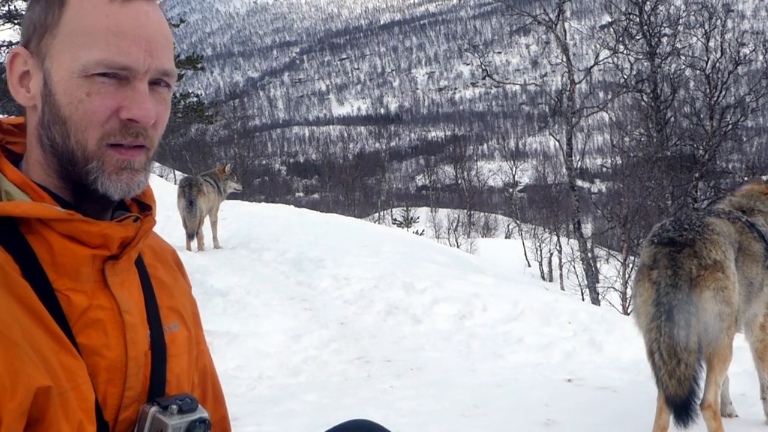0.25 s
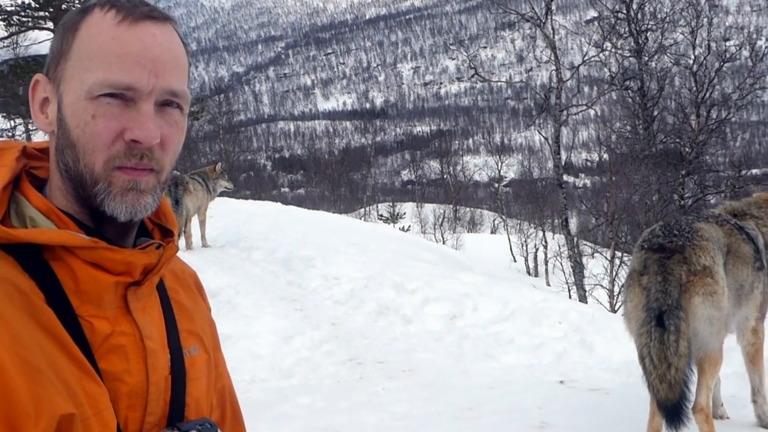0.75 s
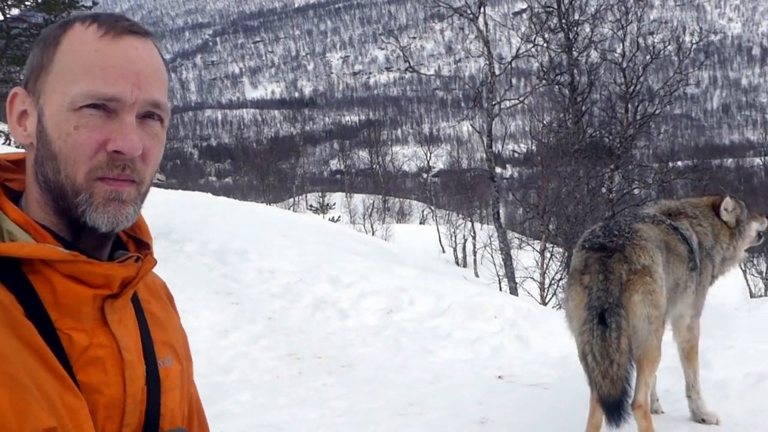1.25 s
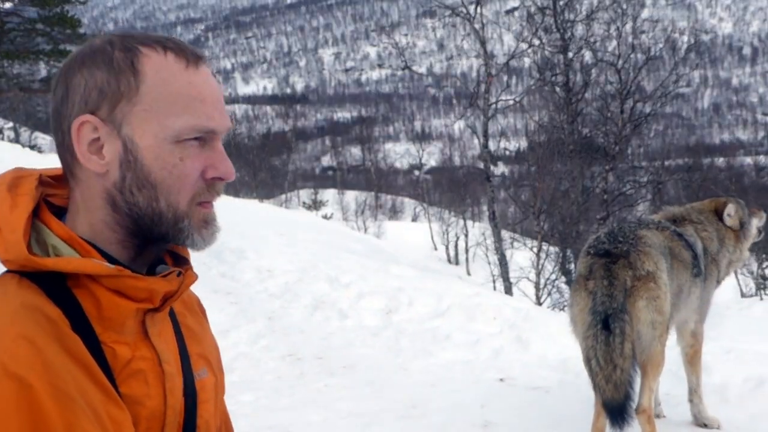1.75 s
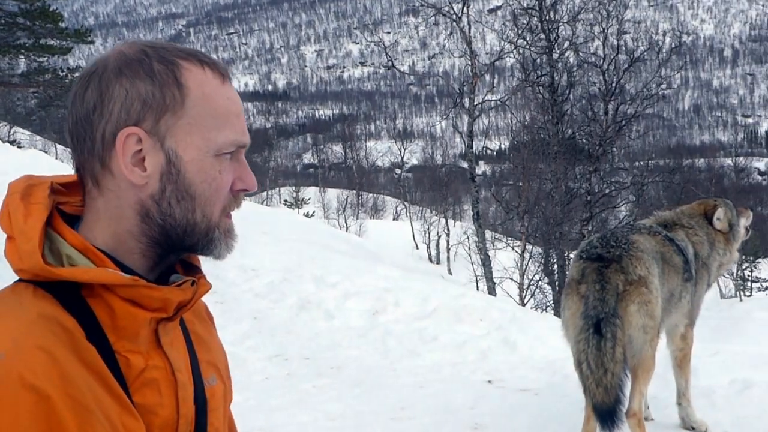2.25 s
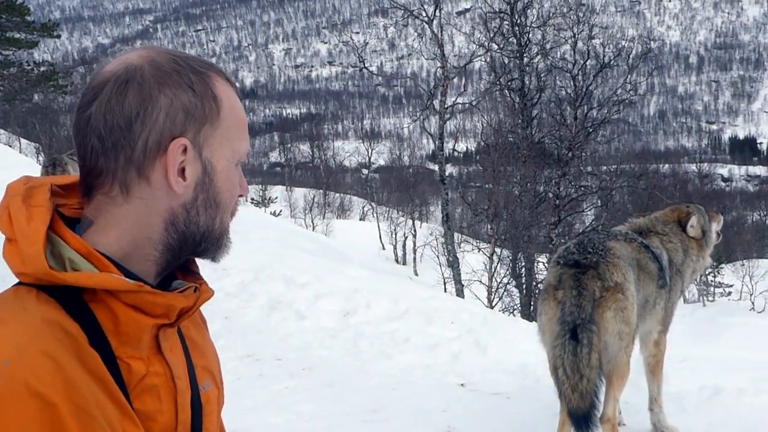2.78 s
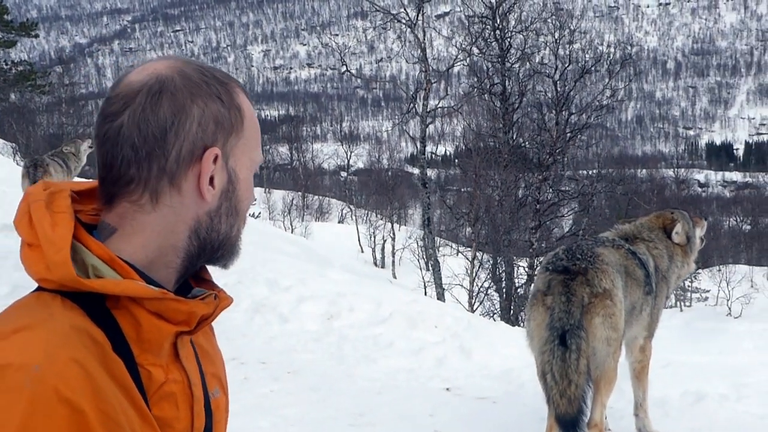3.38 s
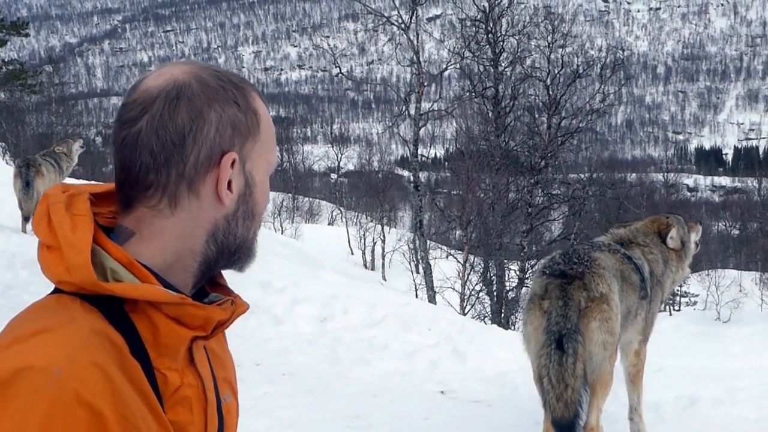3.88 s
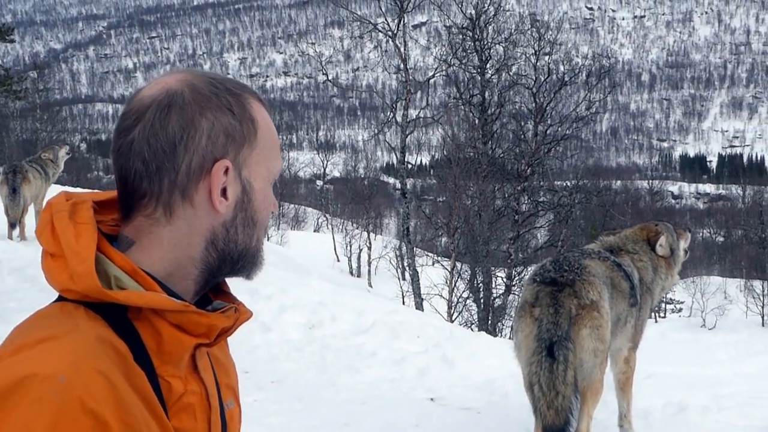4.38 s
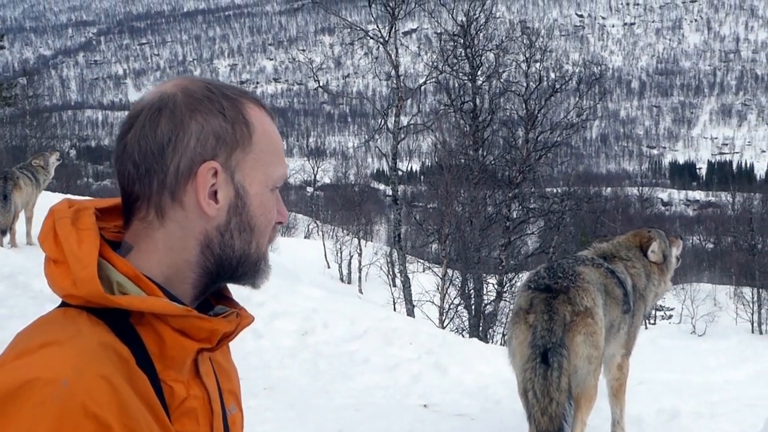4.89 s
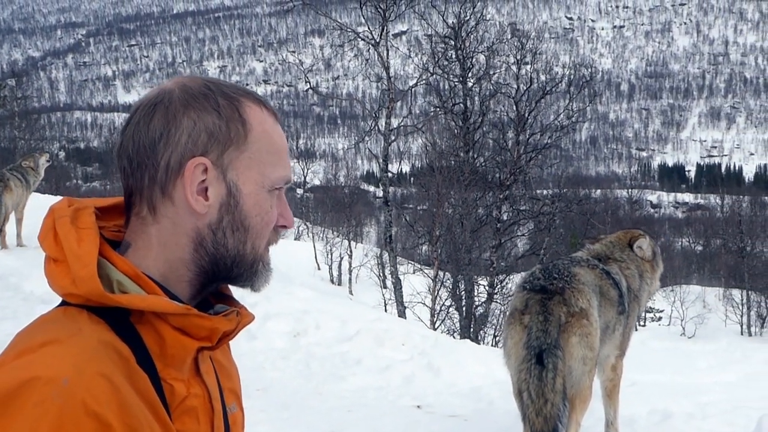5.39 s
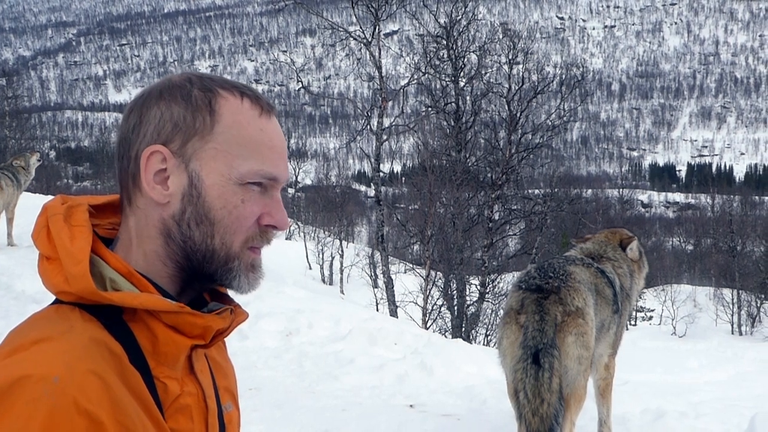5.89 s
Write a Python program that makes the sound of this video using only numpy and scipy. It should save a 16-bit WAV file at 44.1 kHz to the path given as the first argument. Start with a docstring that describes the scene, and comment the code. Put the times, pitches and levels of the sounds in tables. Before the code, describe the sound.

Wolves howl together on a snowy hillside, one close and loud, others behind it and far off, while low wind thumps buffet the microphone.

```python
"""Snowy hillside: a pack of wolves howls, one near, one a little further, others far off.
Howls are sums of gliding harmonics shaped by mouth and throat; they cross and beat.
The slopes return a faint echo built from sparse decaying reflections.
Wind buffets the two microphone ports separately as coloured random thumps.
Under it lie a thin noise hiss, a few dry ringing ticks, and soft noise rustles and puffs."""
import sys
import numpy as np
from scipy import signal
from scipy.fft import rfft, irfft, next_fast_len
from scipy.io import wavfile
from scipy.ndimage import uniform_filter1d

SR = 44100
rng = np.random.default_rng(int(sys.argv[2]) if len(sys.argv) > 2 else 0)


def voltage_ratio(level):
    """Linear amplitude factor for a level in decibels (scalar or array-like)."""
    return 10 ** (np.asarray(level, float) / 20)


def unload_wav(signal):
    """Save mono or channel-first audio to the path in sys.argv[1] as 16-bit WAV at rate SR, clipped to [-1, 1]."""
    wavfile.write(
        sys.argv[1],
        SR,
        np.round(np.clip(np.atleast_2d(signal).T, -1, 1) * 32767).astype(np.int16),
    )


N = 270774  # samples


def evened(x):
    """Scales to rms 1 over all channels together."""
    return x / np.sqrt(np.mean(x ** 2) + 1e-20)


def read(points, hz):
    """Reads a spectrum table on a log-frequency axis."""
    f, value = np.transpose(points)
    return np.interp(np.log(hz + 1), np.log(f + 1), value)


def add(mix, start_s, sound):
    """Mixes a sound in at start_s, cut at the end of the mix."""
    part = mix[..., round(start_s * SR):][..., :sound.shape[-1]]
    part += sound[..., :part.shape[-1]]


def wander(size, hz):
    """Random wobble of rms 1, low-passed at hz."""
    settle = 9000  # samples dropped while the filter settles
    noise = rng.standard_normal(size + settle)
    return evened(signal.lfilter(*signal.butter(2, hz, fs=SR), noise)[settle:])


def coloured(x, points):
    """Filters each channel by a spectrum table."""
    size = next_fast_len(x.shape[-1])
    gain = voltage_ratio(read(points, np.fft.rfftfreq(size, 1 / SR)))
    return irfft(rfft(x, size) * gain, size)[..., :x.shape[-1]]


def hush():
    """Outdoor hush and microphone hiss: smooth noise, partly shared by both ports."""
    # relative spectrum of the hush: freq_hz, density_db
    hush_colour = [(30, -11), (100, 3.5), (400, 2), (700, 2), (1200, -2), (2000, -9), (2500, -11.5),
                   (4300, -8.5), (5500, -16.5), (7000, -13), (8300, -15.5), (10000, -12), (12500, -18),
                   (14500, -33)]
    # noise each port has alone, relative to the shared noise: freq_hz, level_db
    own_share = [(1500, 9.5), (8000, 1)]
    rms_db = -53.5
    shared, *own = rng.standard_normal((3, N))
    pair = shared + coloured(np.array(own), own_share)
    return voltage_ratio(rms_db) * evened(coloured(pair, hush_colour))


def ticks():
    """Dry ticks: a fast-dying sine ring with a wide-band crack."""
    # ticks: start_s, level_db, centre_hz
    tick_rows = [(2.5874, -50, 11560), (2.7971, -57.5, 11440), (3.244, -52, 11430), (3.3419, -50, 11660),
                 (5.0388, -54, 11800), (5.1059, -43, 4180), (5.3448, -41.5, 4080)]
    t60_s, crack_share = 0.0079, 0.44
    out, t = np.zeros(N), np.arange(600) / SR
    for start_s, level_db, hz in tick_rows:
        crack_colour = [(hz * .5, -25), (hz, 0), (hz * 2.4, -22)]
        crack = evened(coloured(rng.standard_normal(len(t)), crack_colour))
        ring = np.sin(2 * np.pi * hz * t)
        add(out, start_s, (ring + crack_share * crack) * voltage_ratio(level_db - 60 * t / t60_s))
    return out


def puff(length_s, level_db, hz):
    """A grainy burst of noise around hz, swelling and fading."""
    size = round(length_s * SR)
    grain = rng.standard_normal(size) * voltage_ratio(3.0 * wander(size, 150))
    colour = [(hz * 0.45, -30), (hz * 0.8, -2), (hz, 0), (hz * 1.4, -6), (hz * 2.3, -30)]
    return voltage_ratio(level_db) * evened(coloured(grain, colour)) * np.hanning(size)


def rustles():
    """Short soft rustles: single noise puffs."""
    # rustles: start_s, length_s, level_db, centre_hz
    rustle_rows = [(0.08, .15, -65.5, 3670), (1.788, .15, -65.5, 3522), (3.08, 0.16, -66.5, 3600),
                   (3.864, .14, -67, 3500), (5.663, 0.12, -63.5, 2500), (5.741, .11, -60.5, 2580),
                   (5.821, .12, -61, 2500), (5.939, .11, -62, 2540)]
    out = np.zeros(N)
    for start_s, *shape in rustle_rows:
        add(out, start_s, puff(*shape))
    return out


def chatter():
    """Five faint husky noise puffs in a regular run."""
    # the run: first_s, spacing_s, level_db, centre_hz
    first_s, spacing_s, level_db, hz = (3.601, .104, -57, 1910)
    out = np.zeros(N)
    for k in range(5):
        add(out, first_s + k * spacing_s, puff(.085, level_db, hz))
    return out


def gusts_db():
    """Wind level at each port: slow wavering pressure plus the power of sudden slaps."""
    # slow wind pressure: time_s, left_db, right_db
    pressure_rows = [(0.0, -63, -50.5), (0.3, -57.5, -66.5), (0.599, -36, -41.5), (0.95, -32.5, -40),
                     (1.601, -27.5, -26), (1.85, -25.5, -33.5), (2.2, -34.5, -41.5), (2.5, -39.5, -21.5),
                     (3.101, -41.5, -33), (3.5, -45, -27.5), (4.2, -44, -34), (4.4, -47.5, -34.5),
                     (4.6, -69, -57), (4.86, -58, -42.5), (5.0, -56, -58), (5.17, -65, -42.5),
                     (5.35, -53, -55.5), (6.14, -75, -68)]
    # sudden slaps of wind: peak_s, length_s, left_db, right_db
    slap_rows = [(0.157, 0.094, -39, -62), (0.346, 0.035, -40.5, -44), (0.944, 0.075, -31, -28.5),
                 (1.14, 0.23, -23.5, -41), (1.302, 0.071, -18.5, -27.5), (1.397, .1, -14.5, -23.5),
                 (1.62, 0.084, -28.5, -28.5), (2.096, 0.064, -20, -48.5), (2.245, 0.045, -30.5, -32.5),
                 (2.506, 0.084, -36.5, -24.5), (2.883, 0.033, -47.5, -30.5), (3.128, 0.14, -27, -30),
                 (3.387, 0.08, -32, -22), (3.722, 0.042, -24, -29), (4.15, 0.12, -53.5, -24.5),
                 (5.438, 0.089, -40.5, -24.5), (5.79, 0.11, -30.5, -26)]
    waver_db, waver_hz = 2.0, 7.0
    t = np.arange(N) / SR
    time_s, *ports_db = np.transpose(pressure_rows)
    slow_db = [np.interp(t, time_s, port_db) + waver_db * wander(N, waver_hz) for port_db in ports_db]
    power = voltage_ratio(np.array(slow_db)) ** 2
    for peak_s, length_s, *slap_db in slap_rows:
        swell = np.hanning(round(length_s * SR)) ** 2
        add(power, peak_s - length_s / 2, voltage_ratio(np.array(slap_db)[:, None]) ** 2 * swell)
    return 10 * np.log10(power)


def wind():
    """Eddies strike each port as uneven thumps in clumps; stronger gusts reach higher."""
    # colour of buffeting in a light gust: freq_hz, gain_db
    breeze_colour = [(40, -50.5), (65, -24), (100, 1.5), (140, 3), (220, -1.5), (320, -21), (500, -32),
                     (2000, -85)]
    # colour of buffeting in a strong gust: freq_hz, gain_db
    blast_colour = [(40, -52), (65, -27.5), (100, -14.5), (160, 0.5), (250, -1), (350, -5.5), (500, -20),
                    (900, -30.5), (3000, -86)]
    eddies_per_s, spread_db, lump_db, lump_hz = 450, 3.0, 3.5, 38
    level_db = gusts_db()
    hit, size, sign = rng.random((3, 2, N))
    thumps = (hit < eddies_per_s / SR) * voltage_ratio(-spread_db * np.log(size + 0.0078)) * np.sign(sign - .5)
    thumps = thumps * voltage_ratio(lump_db * np.array([wander(N, lump_hz), wander(N, lump_hz)]))
    light = evened(coloured(thumps, breeze_colour))
    heavy = evened(coloured(thumps, blast_colour))
    strong = np.clip((level_db + 44) / 22, 0, 1)  # 0 light, 1 strong
    buffet = voltage_ratio(level_db) * ((1 - strong) * light + strong * heavy)
    return buffet + 0.19 * buffet[::-1]  # part of each eddy reaches the other port


def echo(x):
    """Slopes: sparse reflections of random sign, each band dying at its own speed."""
    # decay of the slopes: freq_hz, t60_s
    slope_decay = [(300, 0.24), (1000, 0.4), (3000, 0.25), (9000, 0.029)]
    first, spacing = 1200, 20  # samples
    taps = np.zeros((2, SR))
    jitter = rng.integers(0, spacing, (2, (SR - first - 1) // spacing))
    at = np.arange(first, SR - spacing, spacing) + jitter
    np.put_along_axis(taps, at, rng.choice([-1., 1.], at.shape), 1)
    taps[1] = (taps[0] + taps[1]) / np.sqrt(2)  # the ports hear partly the same slopes
    hz, t, z = signal.stft(taps, SR, nperseg=256)
    decay = voltage_ratio(-60 * t / read(slope_decay, hz)[:, None])
    tail = signal.istft(z * decay, SR, nperseg=256)[1]
    return signal.fftconvolve(x[None], tail / np.linalg.norm(tail[0]), axes=1)[:, :N]


def howl(t, hz, harmonic_db, count, flutter, hoarse_db):
    """Vocal folds: harmonics on a slightly unsteady pitch, each with a skirt of breath."""
    lag_rad = .8  # higher harmonics leave the throat later, which rounds the wave
    turns = np.cumsum(hz * (1 + flutter * wander(len(t), 14))) / SR
    breath = 1 + voltage_ratio(hoarse_db) * wander(len(t), 76)
    voice = sum(voltage_ratio(harmonic_db(k)) * np.cos(2 * np.pi * k * turns - lag_rad * k ** 2)
                for k in range(1, count + 1))
    onset = np.clip((t - t[0]) / .02 + (t[0] == 0), 0, 1)  # none if already howling at 0 s
    return np.sqrt(2) * voice * breath * onset


def far_wolf(rows, colour):
    """Distant wolf: all harmonics share one effort and one colour; the end fades out."""
    time_s, *columns = np.transpose(rows)
    t = np.arange(time_s[0], time_s[-1] + 0.04, 1 / SR)
    hz, effort_db = (np.interp(t, time_s, c) for c in columns)

    def level_db(k):
        """Level of harmonic k."""
        return effort_db + read(colour, k * hz)
    voice = howl(t, hz, level_db, count=7, flutter=0.0018, hoarse_db=-28.5)
    return time_s[0], voice * np.clip((t[-1] - t) / 0.055, 0, 1)


def narrow_mouthed_wolves():
    """Distant howls through a narrow mouth, which darkens the harmonics."""
    # one curve per howl: time_s, pitch_hz, effort_db
    narrow_rows = [
        [(0, 489, -69), (.09, 475, -51), (.15, 430, -44), (.38, 416.3, -45), (.76, 408.4, -44),
         (1.1, 385, -51.5), (1.3, 371.4, -36), (1.52, 381, -43.5), (2.0, 384, -45), (2.3, 374, -45.5),
         (3.4, 365.7, -49.5)],
        [(3.7, 296, -61), (3.899, 306.7, -51.5), (4.971, 323.2, -53), (5.349, 308, -48), (5.6, 316, -62)],
    ]
    # throat and air together: freq_hz, gain_db
    narrow_colour = [(300, -9), (420, 3), (630, 0), (850, -12), (1200, -22.5), (1650, -29), (1900, -16),
                     (2100, -25), (2600, -41)]
    return [far_wolf(rows, narrow_colour) for rows in narrow_rows]


def wide_mouthed_wolves():
    """Distant howls through a wide mouth, which lets higher bands through."""
    # one curve per howl: time_s, pitch_hz, effort_db
    wide_rows = [
        [(0.0, 495, -39.5), (0.13, 510.0, -39), (0.229, 502.4, -39), (0.394, 483, -43.5), (0.678, 455, -46),
         (0.758, 442.6, -48), (1.247, 377.7, -53.5)],
        [(1.601, 494, -49), (1.781, 582, -43.5), (1.83, 552.5, -45), (1.891, 598.3, -47), (1.972, 568, -47.5),
         (2.1, 637, -43), (2.221, 747, -51), (2.299, 686, -42.5), (2.45, 596, -50), (2.649, 548.6, -59.5)],
        [(5.78, 511, -64), (5.9, 530, -65), (6.14, 538, -52)],
    ]
    # throat and air together: freq_hz, gain_db
    wide_colour = [(300, 24), (500, -4), (630, 4), (830, -5.5), (1000, -14.5), (1290, 1.5), (1500, -28),
                   (1900, -5.5), (2050, -16), (2300, -61), (2600, -26), (3200, -63)]
    return [far_wolf(rows, wide_colour) for rows in wide_rows]


def mouth_db(hz, opening):
    """Mouth gain: a resonance passed twice, rising as the jaw opens, a tilt, thin bass, a trough."""
    shut_hz, open_hz, sharpness = 450, 1300, 1.967
    tilt_db_per_octave, thin_below_hz = 3, 300
    trough_hz, trough_octaves, trough_depth_db = 2360, 0.5, -12  # a side cavity swallows this band
    u = (hz / (shut_hz * (open_hz / shut_hz) ** opening)) ** 2
    peak_db = -20 * np.log10((1 - u) ** 2 + u / sharpness ** 2)
    thin_db = -20 * np.log10(1 + (thin_below_hz / hz) ** 6)
    trough_db = trough_depth_db * np.exp(-(np.log2(hz / trough_hz) / trough_octaves) ** 2)
    return peak_db + thin_db + trough_db + tilt_db_per_octave * np.log2(hz / shut_hz)


def close_wolf(rows, edge, ring, count, flutter, hoarse_db, upper_db, head_db, top_db):
    """Three low harmonics follow the mouth shape; the upper ones pass the throat resonances."""
    # what throat and mouth let through from the 4th harmonic up: freq_hz, gain_db
    throat_colour = [(1200, 4.5), (1600, -0.5), (2000, -9.5), (2350, -16.5), (2620, -8), (3100, -28),
                     (3500, -43), (4550, -35.5), (5400, -54.5), (6400, -36), (8600, -49), (9300, -25.5),
                     (10000, -42), (11000, -39.5), (12500, -59)]
    head_voice_hz, head_span_hz = 680, 60  # above this pitch the folds swing almost like a sine
    dull_start_db, dull_start_s = -18.5, .12  # a howl starts with weak overtones
    upper_fall_db_per_octave = -9.5  # from the 4th harmonic up
    time_s, *columns = np.transpose(rows)
    t = np.arange(time_s[0], time_s[-1] + .01, 1 / SR)
    hz, effort_db, opening = (np.interp(t, time_s, c) for c in columns)
    edge_db = np.interp(t, *np.transpose(edge))
    head = np.clip((hz - head_voice_hz) / head_span_hz, 0, 1)
    ring_db = np.interp(t, *np.transpose(ring))
    sheen_db = 0.4 * ring_db + top_db  # the top resonances change less than the ring
    dull_db = dull_start_db * np.exp((time_s[0] - t) / dull_start_s)

    def low_db(k):
        """Level of harmonic k, 1 to 3."""
        unsteady_db = 0.77 * (k - 1) * wander(len(t), 6.6)
        fold_db = (0, head_db * head, edge_db)[k - 1]
        return effort_db + mouth_db(k * hz, opening) + unsteady_db + fold_db

    def high_db(k):
        """Level of harmonic k from the 4th up."""
        fall_db = upper_fall_db_per_octave * np.log2(k / 4)
        body_db = upper_db + .5 * effort_db + edge_db + fall_db + dull_db
        drive_db = np.select([k * hz < 2300, k * hz < 3500], [body_db, ring_db], sheen_db)
        patchy_db = 4.3 * wander(len(t), 5.1)  # weak overtones come and go
        patchy_db = patchy_db * np.clip((k * hz - 3000) / 1000, .6, 1)
        return uniform_filter1d(drive_db, size=800) + read(throat_colour, k * hz) + patchy_db

    def level_db(k):
        """Level of harmonic k."""
        return low_db(k) if k <= 3 else high_db(k)
    return time_s[0], howl(t, hz, level_db, count, flutter, hoarse_db)


def second_wolf():
    """The wolf a little further off: a close voice with eight harmonics."""
    # voice: time_s, pitch_hz, effort_db, mouth_opening (0-1)
    second_rows = [(2.08, 593.9, -55, 0.45), (2.18, 658.9, -36.5, 0.4), (2.25, 744.8, -47.5, 0.85),
                   (2.4, 762, -43.5, 0.84), (2.5, 786.2, -45, 0.94), (2.624, 807.7, -46.5, 1),
                   (2.799, 784, -43.5, .85), (3.093, 715.5, -41, 0.65), (3.188, 691.6, -34, 0.47),
                   (3.397, 655.8, -38.5, 0.51), (3.547, 608.8, -44, 0.66), (3.652, 549.9, -41.5, 0.72),
                   (3.816, 528.8, -50.5, .7), (4.021, 496.1, -44.5, 0.46), (4.101, 482.6, -48.5, 0.55),
                   (4.37, 458.3, -40.5, 0.35), (4.56, 444.4, -48, 0.41), (4.719, 416, -38, 0.17),
                   (4.804, 381.5, -33.5, 0.2), (4.994, 372.4, -33.5, 0.12), (5.3, 366.1, -34, 0.12),
                   (5.702, 365, -34.5, 0.062), (5.85, 363.3, -38.5, 0.087), (6.136, 356.3, -37.5, 0.07)]
    # how hard the folds close; moves the 3rd harmonic and those above, to 2.3 kHz: time_s, edge_db
    second_edge = [(2.1, -1.5), (2.4, -8.5), (3.2, -7), (3.6, 7.5), (4.1, 7), (4.8, 10.5), (5.3, 8.5),
                   (6.14, 16.5)]
    # ring of the open mouth above 2.3 kHz: time_s, ring_db
    second_ring = [(2.2, -65), (2.3, -48), (2.45, -60.5), (2.55, -78.5), (3.7, -74), (4.7, -64),
                   (5.201, -69.5)]
    return close_wolf(second_rows, second_edge, second_ring, count=8, flutter=0.0021,
                      hoarse_db=-33.5, upper_db=-49.5, head_db=-1.5, top_db=-16)


def near_wolf():
    """The nearest wolf: a close voice with thirty harmonics."""
    # voice: time_s, pitch_hz, effort_db, mouth_opening (0-1)
    near_rows = [(1.167, 280.6, -47.5, 0), (1.207, 311.3, -34.5, 0.14), (1.232, 335.7, -25.5, 0.01),
                 (1.252, 352.9, -27.5, 0.08), (1.327, 387.8, -25.5, 0.26), (1.336, 396.2, -24, 0.21),
                 (1.346, 537.2, -33, 0.74), (1.374, 543.9, -30, 0.92), (1.384, 596.5, -30.5, 0.48),
                 (1.402, 626.9, -31, 0.48), (1.497, 682.7, -24, 0.33), (1.641, 740.1, -24, 0.67),
                 (1.721, 795.1, -27, 0.76), (1.811, 756, -25, 0.65), (1.886, 730, -26, 0.51),
                 (1.921, 728.4, -26, .44), (1.98, 702.2, -32, 0.6), (2.05, 626, -34, 0.57),
                 (2.08, 586.1, -37, 0.97), (2.14, 579.4, -35, 0.74), (2.28, 536, -36.5, 0.64),
                 (2.5, 530, -34, 0.58), (2.664, 513.6, -34.5, .57), (2.95, 507.8, -34, 0.57),
                 (3.1, 508.4, -34, 0.55), (3.422, 532.5, -35, 0.58), (3.702, 495.3, -32.5, 0.53),
                 (3.761, 472.5, -33.5, 0.5), (3.821, 429.2, -24.5, 0.3), (4.2, 410.5, -25.5, 0.25),
                 (4.954, 407.3, -25.5, 0.24), (5.105, 388.9, -25.5, .34), (5.128, 374.7, -27, 0.41),
                 (5.142, 356.1, -30.5, 0.37), (5.253, 344, -38, 0.4), (5.34, 309.5, -44, 0.48),
                 (5.45, 271.6, -45.5, 0.4), (5.532, 256.7, -44.5, .48), (5.652, 276.1, -44, 0.47),
                 (5.712, 313.6, -44.5, 0.52), (5.745, 352.6, -38.5, .45), (5.765, 379.9, -29.5, 0.55),
                 (5.783, 404.4, -26.5, 0.26), (5.805, 391.7, -23.5, 0.39), (5.822, 358.3, -31.5, 0.33),
                 (5.89, 348.3, -39, .47), (5.951, 355.5, -34.5, 0.46), (6.05, 347.9, -36.5, 0.36),
                 (6.136, 346.8, -34.5, .45)]
    # how hard the folds close; moves the 3rd harmonic and those above, to 2.3 kHz: time_s, edge_db
    near_edge = [(1.2, 1), (1.3, 2), (1.345, -25), (1.375, -16), (1.41, 18), (1.5, 13), (1.65, -8.5),
                 (1.85, -8), (1.98, 17), (2.08, -5.5), (2.3, -6.5), (2.7, 1), (3.6, -1), (3.9, -6),
                 (4.95, -3.5), (5.119, -10), (5.15, 4), (5.299, 1), (5.7, -3), (5.77, -8), (5.85, 4.5),
                 (6.14, -3)]
    # ring of the open mouth above 2.3 kHz: time_s, ring_db
    near_ring = [(1.25, -57), (1.31, -41), (1.39, -52.5), (1.5, -32.5), (1.6, -52), (1.72, -45),
                 (1.87, -52.5), (1.97, -40), (2.05, -54), (2.15, -61.5), (2.7, -43.5), (3.2, -46),
                 (3.5, -55), (3.949, -45), (4.3, -53), (5.049, -58), (5.17, -54), (5.299, -76)]
    return close_wolf(near_rows, near_edge, near_ring, count=30, flutter=0.0014,
                      hoarse_db=-36, upper_db=-32, head_db=-12.5, top_db=-26.5)


def wolf_pack():
    """All wolves panned by level; the microphone housing shades the left port."""
    # left-right balance of near, second, wide-mouthed and narrow-mouthed howls: left_over_right_db
    pans_db = [-0.61, -0.2, -.6, -.6, -1.2, -.7, -.8]
    # shading of the left port: freq_hz, gain_db
    housing_shade = [(350, 0.5), (600, -0.5), (1100, -1.5), (1700, -5.5), (2300, -5.5), (4000, -0.2)]
    voices = [near_wolf(), second_wolf()] + wide_mouthed_wolves() + narrow_mouthed_wolves()
    pack = np.zeros((2, N))
    for (start_s, voice), pan_db in zip(voices, pans_db):
        add(pack, start_s, voice * voltage_ratio([[pan_db / 2], [-pan_db / 2]]))
    return np.array([coloured(pack[0], housing_shade), pack[1]])


def scene():
    """Background, wind, echo and pack at the two ports."""
    background = hush() + ticks() + rustles() + chatter()
    pack = wolf_pack()
    return background + wind() + voltage_ratio(-24.5) * echo(pack.mean(0)) + pack


def roll_off(x):
    """The treble ends steeply here."""
    return signal.sosfilt(signal.butter(12, 15050, fs=SR, output="sos"), x)


def record(dry):
    """The finished two-port mix as stored."""
    return roll_off(dry)


dry = scene()
out = record(dry)
unload_wav(out)
```